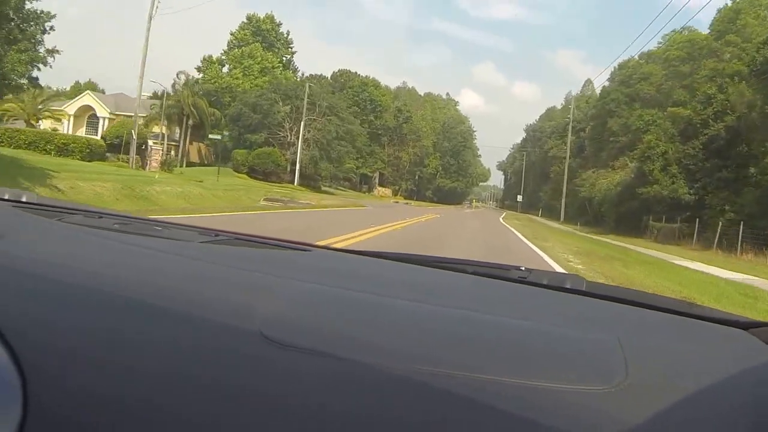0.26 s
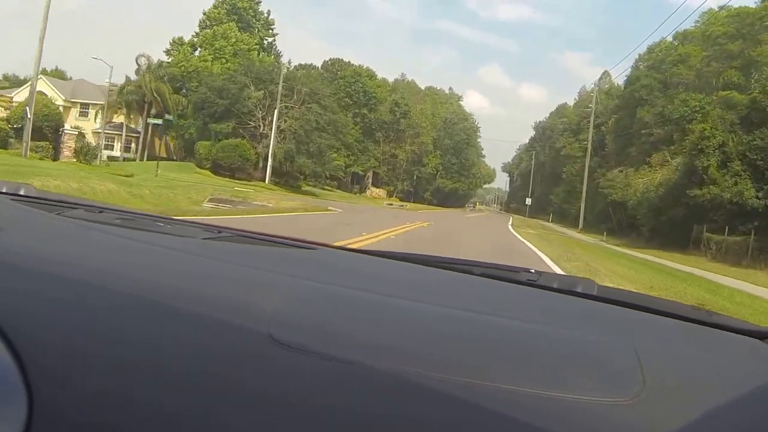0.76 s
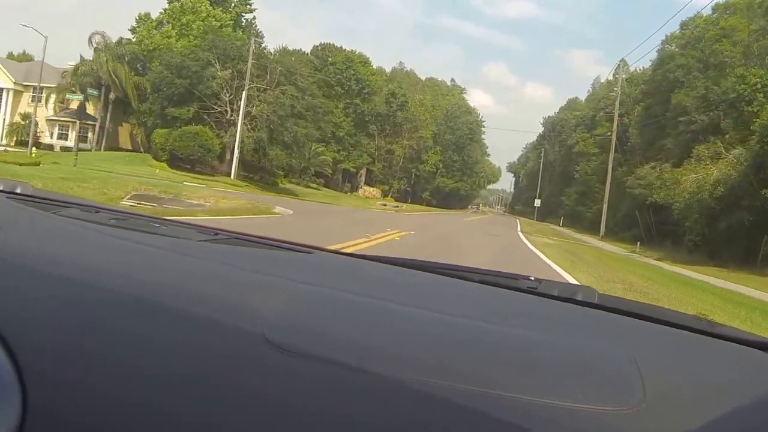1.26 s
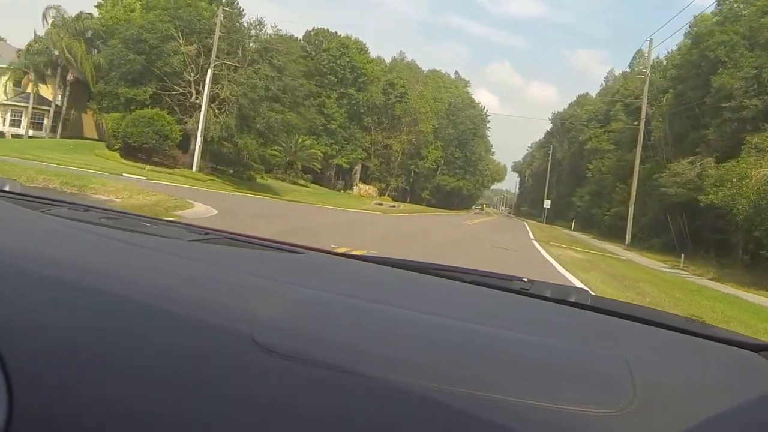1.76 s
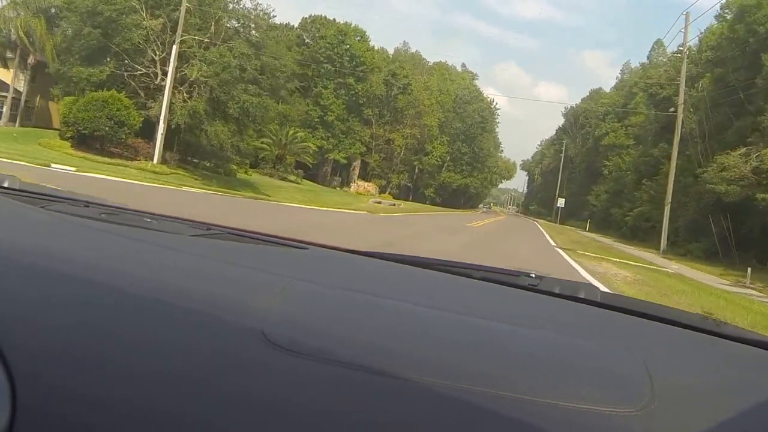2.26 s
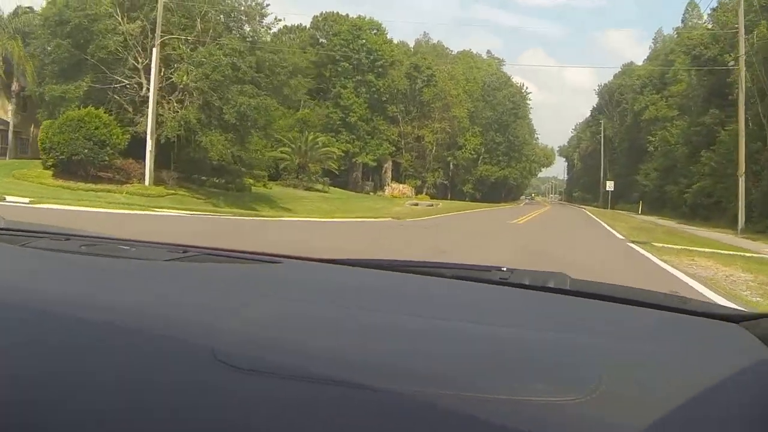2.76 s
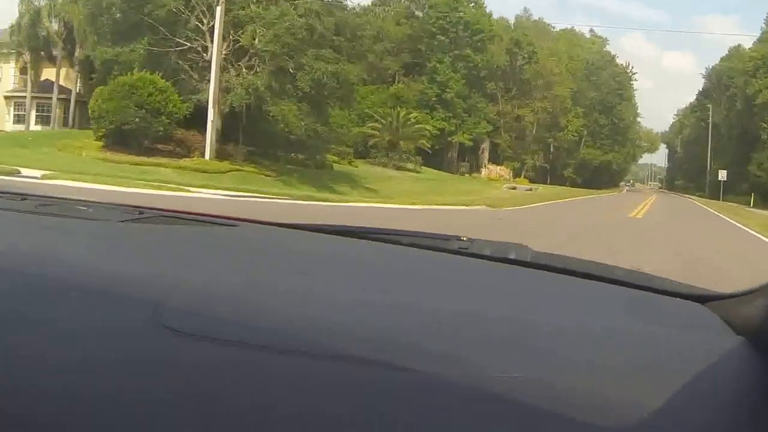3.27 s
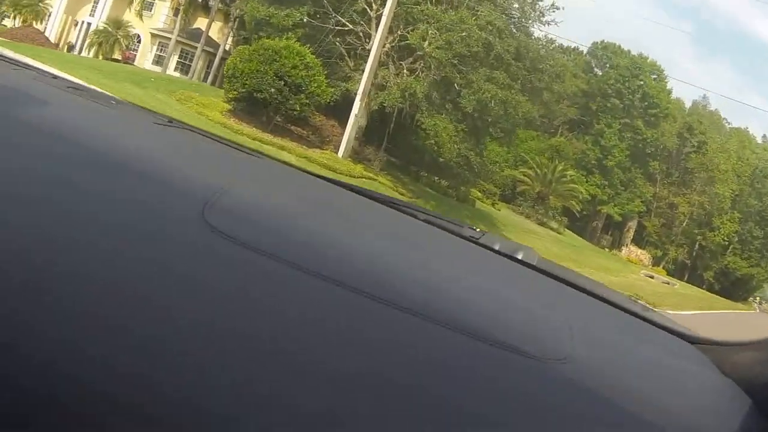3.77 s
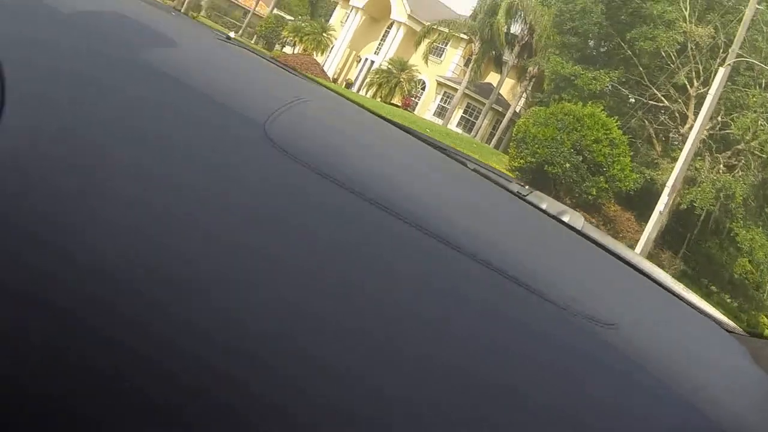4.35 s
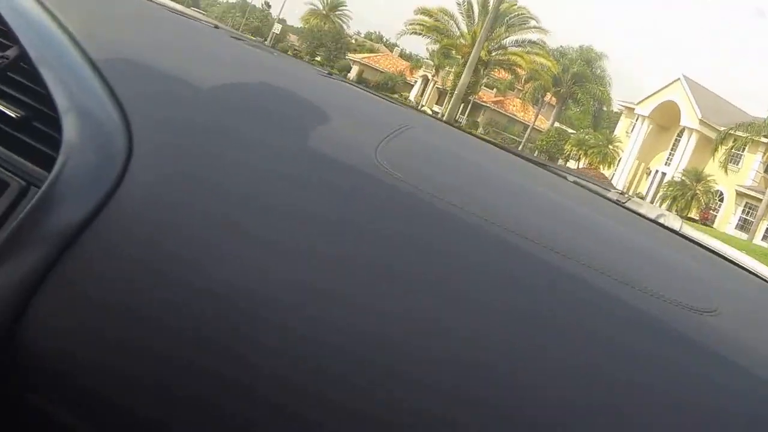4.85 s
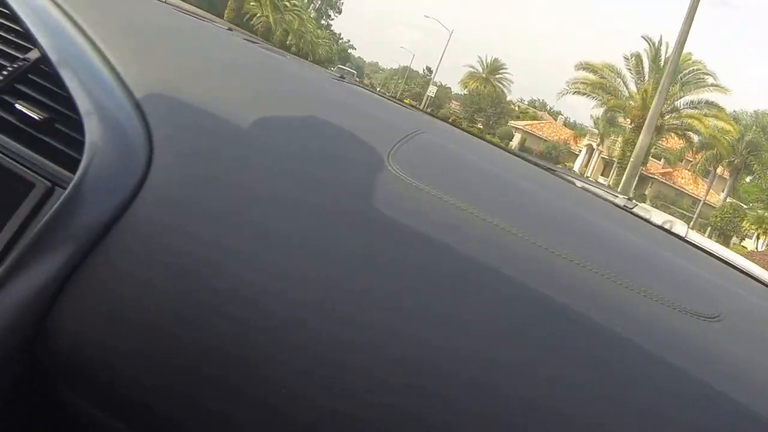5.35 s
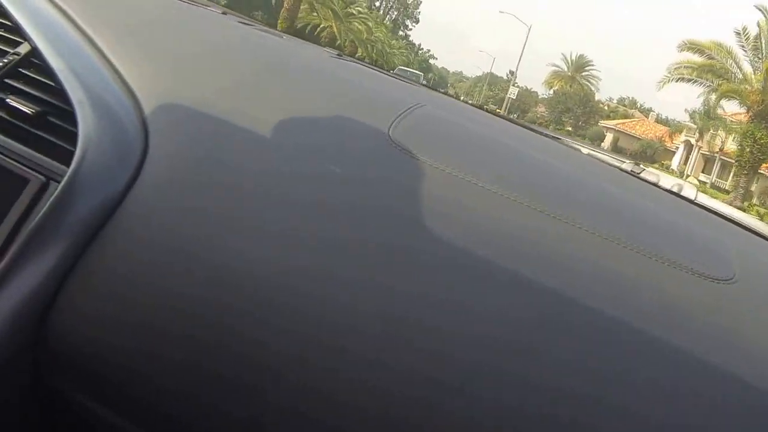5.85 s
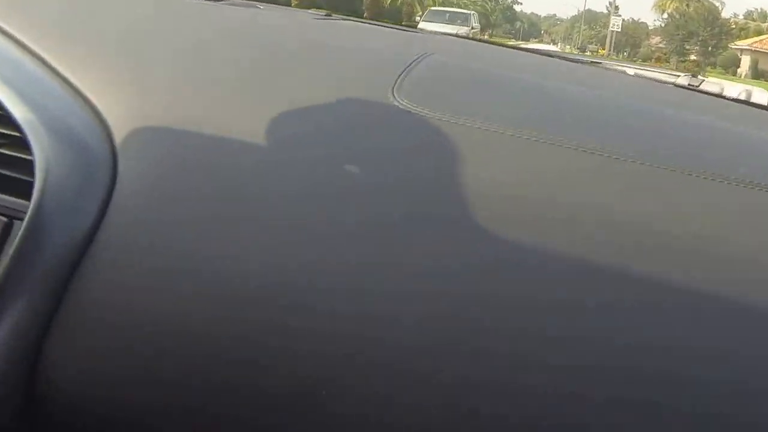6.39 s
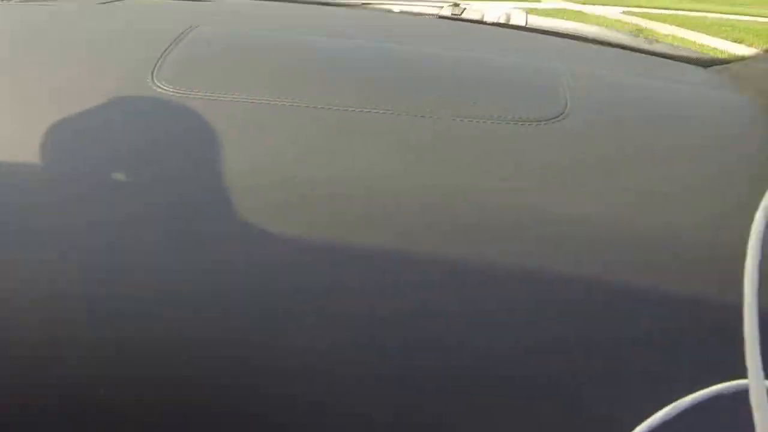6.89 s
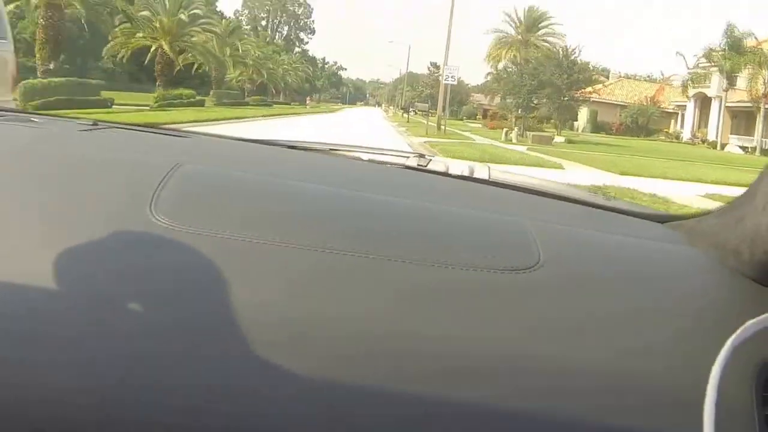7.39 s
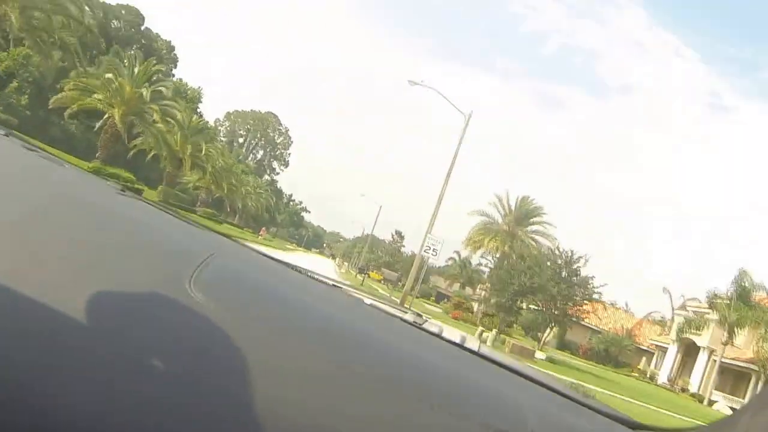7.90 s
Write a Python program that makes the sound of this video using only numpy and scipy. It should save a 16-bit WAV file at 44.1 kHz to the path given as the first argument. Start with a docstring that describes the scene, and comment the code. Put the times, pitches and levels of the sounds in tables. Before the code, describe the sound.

A sports car engine, heard from a seat in the cabin, winds down to a low idle, gives a small blip and accelerates smoothly, swelling into a boom at certain pitches. Road rumble and soft wind hiss lie underneath, with occasional ticks of trim. In the last stretch, handling of the microphone brings close, irregular thuds, taps and short scrapes, louder than the engine as its pitch levels off.

```python
"""A ten-cylinder sports car engine, heard from the seat, coasts down, idles into a corner and pulls away.
Its orders, tones at multiples of crankshaft speed, boom as they sweep through the cabin's air modes.
Under it lie road rumble, tyre and wind hiss, and the faint hiss and fizz of a hand-held camera.
Trim clicks and fingers rub and tap the camera's housing; near the end the camera is bumped about,
and its gain control ducks after the loud blows."""
import sys
import numpy as np
from scipy import signal
from scipy.io import wavfile
from scipy.ndimage import uniform_filter1d

SR = 44100
rng = np.random.default_rng(int(sys.argv[2]) if len(sys.argv) > 2 else 0)


def transcribe(u):
    """Save the signal u as a 16-bit wav file named by the first command-line argument.

    u: samples, shape (n,) or (channels, n), limited to [-1, 1]; the rate is SR.
    q: integer samples, one column per channel.
    """
    v = np.clip(np.atleast_2d(u).T, -1, 1)
    q = np.round(v * 32767).astype(np.int16)
    wavfile.write(sys.argv[1], SR, q)


N = 358533

# colour of the electronics' hiss: f/Hz, relative level/dB
CIRCUIT_COLOUR = [(2500, -4), (4000, 1), (5500, -3), (7000, -3), (8500, -6.5), (11000, -6.5),
                  (12500, -12.5), (15000, -22), (16000, -30)]
# bands of the electronics' fizz: f/Hz, width per pass/Hz, relative level/dB
FIZZ_BANDS = [(2310, 220, -5), (3140, 1040, -2), (4800, 290, -7.5), (6770, 680, -17.5), (9350, 790, -19.5)]
# fader rides of the low rumble and the road hiss: t/s, rumble gain/dB, tyre and wind gain/dB; the rumble swells
# after 6.8 s come as the camera is bumped
ROAD_FADERS = [(0, -26, -45), (.08, -19.5, -46), (.2, -28.5, -47.5), (.5, -27.5, -48.5), (1.5, -28, -51),
               (2.6, -29.5, -54.5), (3.16, -26, -54), (3.5, -37.5, -55.5), (3.92, -30.5, -56),
               (4.5, -34, -55.5), (4.96, -29, -49.5), (5.15, -33.5, -49.5), (5.5, -28, -48),
               (6.55, -27.5, -47.5), (6.9, -7.5, -45.5), (7.05, -28.5, -47), (7.2, -9.5, -47.5),
               (7.35, -35, -45.5), (7.65, -13.5, -44.5), (7.88, -21.5, -45.5), (8.13, -26.5, -52)]
# colour of the body rumble: f/Hz, relative level/dB
RUMBLE_COLOUR = [(4, -1), (11, 9), (22, 0.5), (30, 6), (40, 5), (52, 2.5), (65, -7.5), (80, -17.5),
                 (120, -33.5), (240, -91)]
# colour of the tyre and wind hiss: f/Hz, relative level/dB
HISS_COLOUR = [(35, -25), (60, 9.5), (100, -11.5), (150, -2.5), (230, -18), (375, -19.5), (600, -26),
               (800, -29.5), (1100, -28), (1850, -36), (2300, -38), (3000, -42), (4500, -53.5),
               (9000, -71.5)]
# narrow resonant bands that give the road hiss a faint whistle: f/Hz, width/Hz, relative level/dB
HISS_RESONANCES = [(1261.6, 38, 0), (1307, 102, -1), (1585, 120, -5.5), (2045, 68, -5.5), (2116, 47, -9.5),
                   (2550, 160, -14.5), (3263, 120, -18.5), (5000, 320, -31.5)]
# camera housing modes (two body, one shell, two lid, three upper): f/Hz, width/Hz, relative level/dB
HOUSING_MODES = [(445, 130, 1.5), (593, 168, 7), (1313, 50, 9.5), (1867, 116, -4), (2260, 170, -12.5),
                 (2430, 284, -0.5), (2730, 470, -7.5), (3130, 200, -9)]
# fingers sliding on the housing: middle t/s, length/s, level/dB
STROKE_CUES = [(2.935, .05, -66), (3.22, .1, -60), (6.674, 0.089, -41), (6.751, .08, -37.5), (6.9, .2, -49),
               (7.22, .16, -45.5), (7.648, .09, -30), (7.871, 0.068, -35.5), (7.983, 0.072, -44)]
# trim and finger clicks: t/s, gain/dB, then against the upper modes: body/dB, shell and lid/dB, crack/dB
CLICK_CUES = [(2.786, -50.5, -5, -6, -3.5), (3.0799, -54.5, -13, -9, -9), (3.1747, -50, -12, 0, -21),
              (3.276, -32, 1.5, 1, -10.5), (3.343, -43.5, -7, -12, -30), (3.629, -53, 2, 4.5, -29),
              (3.707, -46.5, 0, -0.5, -10.5), (3.9228, -47.5, 0, -3, -18), (4.005, -48.5, 0, -4.5, -11.5),
              (4.811, -58, 3, -13, 3.5), (4.9138, -50, -8, -4, -6), (5.3333, -59, 2, 1, -1.5),
              (5.5146, -41, -6, -9, -13.5), (6.6241, -53, 11, 8, -22), (6.6443, -44.5, 9, -3, -10.5),
              (6.6621, -41.5, 23.5, 6, -9), (6.6823, -44, 22, -12, -35), (6.7036, -30.5, -13, -6, -29),
              (6.7415, -45, 16, -6, -25), (6.7993, -38.5, 0.5, -6, -14), (6.8162, -40, 19, -8, -33),
              (6.8605, -33, 11, -0.5, -39), (6.874, -34, 14.5, -8.5, -27), (6.9046, -41.5, 2, -17, -8),
              (6.9409, -28, 12.5, -2, -44), (7.1423, -36.5, 11, -3.5, -35), (7.1868, -35.5, 8.5, -3, -27),
              (7.224, -46, 11, -1, -32), (7.349, -37, -8.5, -8.5, -15), (7.4723, -39.5, 3, -17, -36),
              (7.6165, -37, 12.5, 5.5, -11.5), (7.6365, -31.5, 16.5, 6.5, -36),
              (7.6571, -26, 10, -1, -14.5), (7.6827, -37.5, 16, 9, -38), (7.7135, -34, 10.5, 4.5, -27),
              (7.775, -57.5, 27, 16.5, -17), (7.8048, -44, 14.5, 6.5, -34), (7.8436, -48, 16, 1, -14),
              (7.8746, -42.5, 11, 7.5, -33), (7.9212, -18, 4, 2.5, -13), (7.943, -43.5, 23, 11, -33),
              (7.9692, -39, 11, 5.5, -33), (7.992, -46.5, 21.5, 14.5, -13), (8.047, -48, 15.5, 3.5, -27)]
# blows through hand and mount: t/s, peak level/dB, f/Hz, t60/s, sign of the first swing
THUMP_CUES = [(3.11, -25, 59.4, 0.036, -1), (3.181, -18.5, 44.7, 0.085, 1), (3.277, -18, 43.5, 0.067, -1),
              (3.544, -21, 102, 0.048, 1), (3.79, -19.5, 101, 0.027, 1), (4.33, -21.5, 60, 0.088, 1),
              (6.682, -1, 82.17, 0.024, 1), (6.704, -14, 60, .09, 1), (6.815, -3.5, 127, 0.023, 1),
              (6.858, -5, 129, 0.031, 1), (6.875, -2, 154, 0.066, 1), (6.94, -0.5, 139, 0.032, 1),
              (7.143, -2.5, 151, 0.062, 1), (7.186, -9.5, 165, 0.086, 1), (7.389, -5, 91.1, .021, -1),
              (7.618, 0.5, 119, 0.036, -1), (7.652, 5, 106.5, 0.028, 1), (7.922, -6.5, 50.6, 0.06, -1),
              (7.938, 0, 94.3, 0.02, 1), (7.977, -7, 54, .047, -1), (8.045, -13.5, 113, 0.047, 1)]
# the cabin's broad EQ on the engine: f/Hz, gain/dB
CABIN_EQ = [(40, -30), (80, -22), (110, -10), (145, 0), (185, -6.5), (205, -25), (240, -22), (420, -30.5),
            (560, -43), (750, -59), (950, -63), (1500, -77.5)]
# cabin air modes, peaks and nulls at the seat: f/Hz, width/Hz, gain/dB
CABIN_MODES = [(194.3, 47.4, -7.5), (243.4, 51, 3), (284.7, 14, -6.5), (326, 40, 4), (392.4, 35, 10),
               (455, 100, -6.5), (495.6, 40, 12), (629, 16, 8), (660, 21, 6), (829, 60, 16.5)]
# exhaust resonance while the throttle is shut: f/Hz, width/Hz, gain/dB
EXHAUST_BOOM = (258, 35, 4.1)
# revs through coast, idle, blip and pull-away: t/s, firing rate/Hz
REVS = [(0, 152.6), (.25, 145.3), (.5, 138.8), (1, 124.6), (1.5, 111.6), (2, 97), (2.5, 80.7), (3, 64.95),
        (3.25, 59.83), (3.72, 58.3), (3.87, 74.4), (3.95, 72.2), (4.3, 71.55), (4.55, 74.5), (4.75, 75.47),
        (4.9, 83.5), (5.1, 91.5), (5.25, 96.8), (5.32, 101), (5.42, 101.4), (5.75, 115.4), (6, 121.9),
        (6.25, 132.6), (6.6, 142.6), (7.1, 146.7), (7.5, 141.5), (8.13, 137)]
# engine tone under load: t/s, gain/dB, tilt/(dB per octave), second firing harmonic/dB
ENGINE_LOAD = [(0, -25, 6.5, 2), (.5, -21, -1, -2), (1, -24.5, -1.5, -10.5), (1.5, -24.5, -0.5, -12),
               (1.8, -22, -0.5, -3.5), (2.5, -20, -3, -9), (2.75, -24.5, -3, -1.5), (3, -12, -10.5, -4),
               (3.25, -30, -0.5, -9), (3.75, -26.5, -5.5, -7.5), (3.87, -10.5, -4.5, -10),
               (3.95, -16.5, -1.5, -6), (4.2, -30, -1, -5.5), (4.35, -23, -4.5, -6.5),
               (4.46, -29.5, -1, -9.5), (4.54, -10, -5, -9), (4.75, -9, -3, -10.5), (5.2, -15.5, 3, -2.5),
               (5.5, -13, 2.5, -14.5), (6.2, -17.5, 6.5, -18.5), (6.45, -18.5, 8.5, -1.5),
               (6.7, -19.5, 7.5, 1), (7, -24.5, 9.5, -4), (7.3, -31.5, 12, -1), (7.55, -22.5, -1.5, 0.5),
               (8.13, -26.5, -0.5, 0)]
# balance of the other firing harmonics: harmonic number -> relative level/dB
FIRING_BALANCE = {1: 0.0, 3: -4.5, 4: -6, 5: -6.5, 6: -12.5, 7: -14, 8: -3.5, 9: -9.5, 10: -0.5}
# the four weak orders above each firing harmonic: relative level/dB
WEAK_BALANCE = [-33, -26.5, -24.5, -30]

TIME = np.arange(N) / SR


def gain_of(db):
    """Decibels to amplitude."""
    return 10 ** (np.asarray(db) / 20)


def unit_rms(x):
    """Scales to an rms of one."""
    return x / np.sqrt(np.mean(x ** 2) + 1e-20)


def eq_db(curve, hz):
    """Reads an EQ curve on a log frequency axis."""
    f, db = np.transpose(curve)
    return np.interp(np.log(hz + 1), np.log(f + 1), db)


def bell_db(hz, centre, width, db):
    """A bell-shaped EQ peak or dip."""
    return db / (1 + (2 * (hz - centre) / width) ** 2)


def automation(rows):
    """Turns timed breakpoints into one lane per column."""
    times, *columns = np.transpose(rows)
    return [np.interp(TIME, times, column) for column in columns]


def add(mix, start_s, sound):
    """Drops a sound into the mix."""
    part = mix[round(start_s * SR):][:len(sound)]
    part += sound[:len(part)]


def ring(x, hz, width_hz):
    """A two-pole resonance with gain one at its peak."""
    return signal.lfilter(*signal.iirpeak(hz, hz / width_hz, SR), x)


def resonate(modes, x):
    """Rings each mode in two widened passes, so the valleys between stay dark."""
    return sum(gain_of(db) * ring(ring(x, hz, 1.55 * width), hz, 1.55 * width) for hz, width, db in modes)


def wander(top_hz):
    """Smooth random modulation with an rms of one."""
    coarse = rng.standard_normal(N // 64 + 2)
    smooth = signal.lfilter(*signal.butter(2, top_hz, fs=SR / 64), coarse)
    return np.interp(np.arange(N) / 64, np.arange(len(coarse)), unit_rms(smooth))


def noise(colour, patchy_db, size):
    """Coloured noise with drifting louder patches."""
    frames, hz = 4 * N // size + 5, np.fft.rfftfreq(size, 1 / SR)
    real, imag, patches = rng.standard_normal((frames, len(hz), 3)).T
    patches = unit_rms(uniform_filter1d(uniform_filter1d(patches, size=8, axis=0), size=6, axis=1))
    spectra = (real + 1j * imag) * gain_of(eq_db(colour, hz)[:, None] + patchy_db * patches)
    return unit_rms(signal.istft(spectra, nperseg=size, noverlap=size - size // 4)[1][:N])


def electronics():
    """The camera's noise floor: hiss and a thin whine throb with each picture, and a short fizz recurs."""
    picture_hz, fizz_start_s, fizz_every_s = 24000 / 1001, 1.132, 1.3192
    beat = 2 * np.pi * (picture_hz * TIME - .68)
    throb = gain_of(1.3 * np.cos(beat) + 0.82 * np.cos(2 * beat + .6))
    whine = gain_of(-17) * unit_rms(ring(rng.standard_normal(N), hz=11317, width_hz=60))
    since = (TIME - fizz_start_s) % fizz_every_s
    gate = (since < .05) * np.minimum(since / 0.0011, 1) * np.exp(-since / 0.041)
    white = rng.standard_normal(N)
    fizz = sum(gain_of(db) * unit_rms(ring(ring(white, hz, width), hz, width))
               for hz, width, db in FIZZ_BANDS)
    hiss = noise(CIRCUIT_COLOUR, patchy_db=3.7, size=512)
    return gain_of(-71.5) * throb * (hiss + whine) + gain_of(-50.5) * gate * unit_rms(fizz)


def road():
    """The bed: a lumpy low rumble that swells as the camera is bumped about near the end, and tyre and wind
    hiss with a faint whistle."""
    rumble_db, hiss_db = automation(ROAD_FADERS)
    lumps = gain_of(rumble_db - 1.5 + 1.4 * wander(top_hz=2))
    rumble = lumps * noise(RUMBLE_COLOUR, patchy_db=0.84, size=4096)
    hiss = noise(HISS_COLOUR, patchy_db=-1, size=1024)
    rough_noise = rng.standard_normal(N) * gain_of(0.97 * wander(top_hz=60))
    whistle = gain_of(-3.5) * unit_rms(resonate(HISS_RESONANCES, rough_noise))
    flutter = gain_of(8.5 + wander(top_hz=9.1))
    return rumble + gain_of(hiss_db) * (flutter * hiss + whistle)


def rubbing():
    """Fingers stick and slip on the housing; each grainy stroke swells and fades."""
    grains = uniform_filter1d(rng.standard_normal(N), size=12) * gain_of(4.7 * wander(top_hz=150))
    swells = sum(gain_of(db) * np.cos(np.pi * np.clip((TIME - middle) / length, -.5, .5)) ** 2
                 for middle, length, db in STROKE_CUES)
    return swells * unit_rms(resonate(HOUSING_MODES, grains))


def clicks():
    """A snap of noise with a faint tail rings the housing, with a thin crack on top."""
    out, t = np.zeros(N), np.arange(SR // 10) / SR
    snap_s, tail_s, soft_attack_s = .003, .019, .0003
    crack_band = np.r_[signal.butter(4, 3800, "high", fs=SR, output="sos"),
                       signal.butter(2, 5500, fs=SR, output="sos")]
    for start, db, body_db, shell_db, crack_db in CLICK_CUES:
        burst = rng.standard_normal(len(t)) * (np.exp(-t / snap_s) + gain_of(-23) * np.exp(-t / tail_s))
        fingertip = uniform_filter1d(burst * (1 - np.exp(-t / soft_attack_s)), size=9)  # a duller blow
        # the grip detunes and damps the shell
        gripped = np.multiply(HOUSING_MODES[2:3], [rng.uniform(.96, 1.04), 2.2, 1])
        layers = [resonate(HOUSING_MODES[5:], burst),
                  resonate(HOUSING_MODES[:2], fingertip),
                  resonate(gripped, fingertip),
                  resonate(HOUSING_MODES[3:5], fingertip),
                  signal.sosfilt(crack_band, burst)]
        upper, body, shell, lid, crack = (x / np.sqrt(np.mean(x[:300] ** 2)) for x in layers)
        to_lid = gain_of((8.5 + 0.6 * crack_db) / 2)  # sharp blows ring the lid, dull ones the shell
        knock = gain_of(body_db) * body + gain_of(shell_db) * (shell / to_lid + lid * to_lid)
        add(out, start, gain_of(db - 3.5) * (upper + knock + gain_of(crack_db) * crack))
    return out


def thumps():
    """Each blow swings the camera in a low, quickly damped thud."""
    out, t = np.zeros(N), np.arange(SR // 4) / SR
    attack = (1 - np.exp(-t / 0.0042)) ** 2
    for start, db, hz, t60, sign in THUMP_CUES:
        swing = np.sin(2 * np.pi * hz * t) * attack * gain_of(-60 * t / t60)
        add(out, start, sign * gain_of(db) * swing / abs(swing).max())
    return out


def engine():
    """Tones at whole multiples of crankshaft speed, shaped by the load and by the cabin they boom in."""
    firings_per_turn, throttle_opens_s = 5, 3.1
    firing_hz, = automation(REVS)
    load_db, tilt_db, second_db = automation(ENGINE_LOAD)
    crank_hz = uniform_filter1d(firing_hz, size=3000) / firings_per_turn
    turns = np.cumsum(crank_hz) / SR
    shut = TIME < throttle_opens_s
    grid_hz = np.arange(1500.)
    cabin_db = eq_db(CABIN_EQ, grid_hz) + sum(bell_db(grid_hz, *mode) for mode in CABIN_MODES)
    out = np.zeros(N)
    for order in range(3, 51):
        hz = order * crank_hz
        harmonic, offset = divmod(order, firings_per_turn)
        if offset:  # unequal firings give weak orders, which stand out more off the throttle
            db, wobble_db = WEAK_BALANCE[offset - 1] + 0.4209 * order + 3.5 * shut, 3
        else:
            db, wobble_db = FIRING_BALANCE.get(harmonic, second_db), 1.1
        drive_db = load_db + tilt_db * np.log2(order / firings_per_turn)
        boom_db = np.interp(hz, grid_hz, cabin_db) + shut * bell_db(hz, *EXHAUST_BOOM)
        level = gain_of(db + drive_db + boom_db + wobble_db * wander(top_hz=6.6))
        out += np.sqrt(2) * level * np.sin(2 * np.pi * (order * turns + rng.random()))
    return out


def scene():
    """The mono mix at the seat."""
    return (engine() + road() + thumps() + clicks() + rubbing() + electronics())[None]


def record(dry):
    """The camera's chain: low cut, gain control that ducks after loud blows, soft saturation, high cut."""
    threshold_db, release_db_per_s, high_cut_hz = -9.5, 17.1, 15600
    dry = signal.lfilter(*signal.butter(2, 6, "high", fs=SR), dry)
    dry = dry * np.minimum(np.arange(N) / 200, 1)  # click-free fade-in
    power_db = 10 * np.log10(abs(uniform_filter1d(dry[0] ** 2, size=500)) + 1e-12)
    release_db = TIME * release_db_per_s
    held_db = np.maximum.accumulate(power_db + release_db) - release_db
    over_db = np.maximum(held_db - threshold_db, 0)
    late_db = np.r_[np.zeros(500), uniform_filter1d(over_db, size=400)][:N]  # the transient slips through
    ducked = dry / gain_of(1.04 * late_db)
    rounded = ducked / (1 + abs(ducked / .95) ** 6) ** (1 / 6)
    padded = np.pad(rounded, ((0, 0), (255, 255)), "reflect", reflect_type="odd")
    high_cut = signal.firwin(511, high_cut_hz, window=("kaiser", 9), fs=SR)
    return signal.oaconvolve(padded, high_cut[None], "valid")


dry = scene()
out = record(dry)
transcribe(out)
```